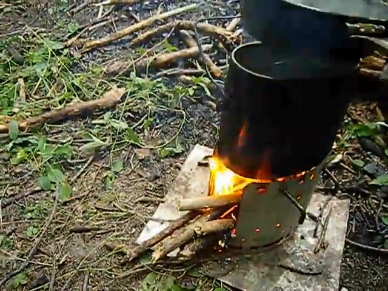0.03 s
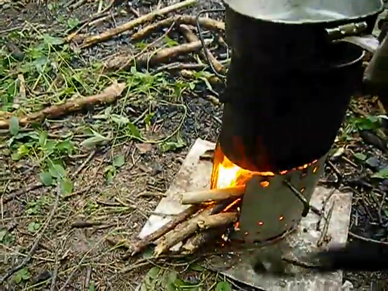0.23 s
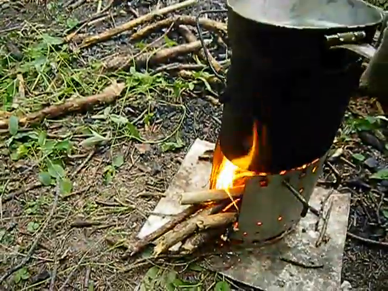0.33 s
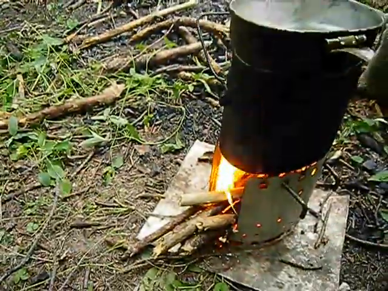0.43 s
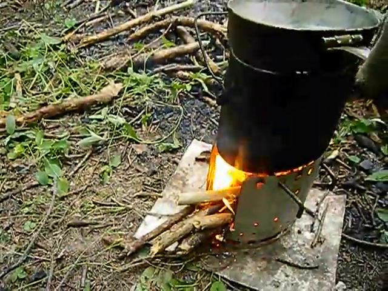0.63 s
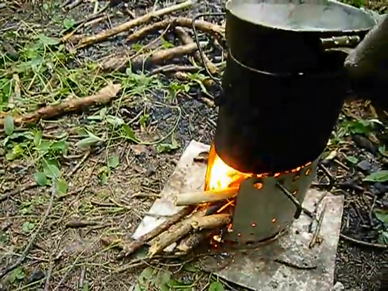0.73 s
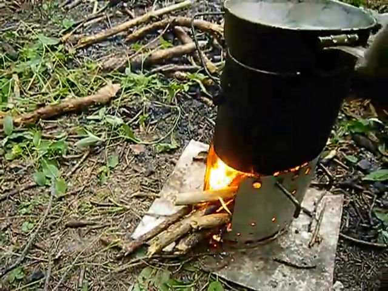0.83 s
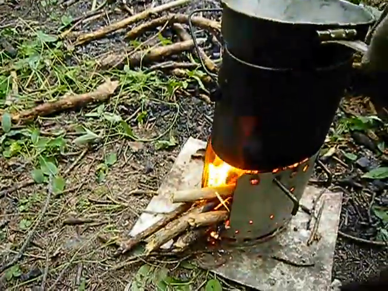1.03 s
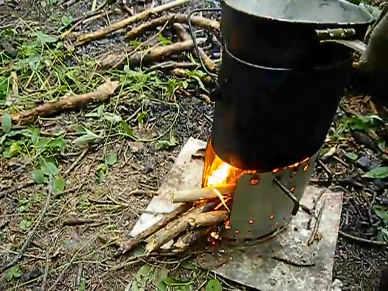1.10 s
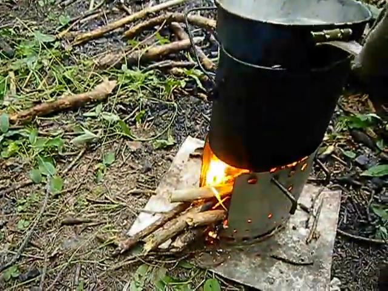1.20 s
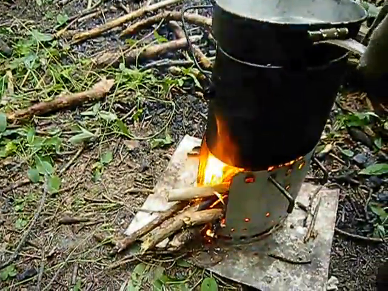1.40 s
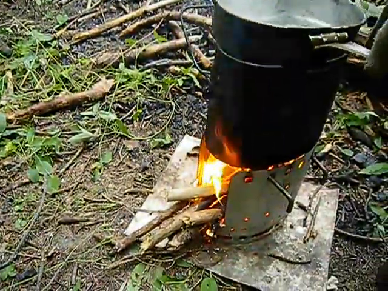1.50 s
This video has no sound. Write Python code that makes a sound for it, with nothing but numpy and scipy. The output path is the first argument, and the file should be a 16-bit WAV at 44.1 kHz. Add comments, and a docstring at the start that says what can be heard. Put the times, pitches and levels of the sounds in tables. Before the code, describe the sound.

A metal pot clanks hard into another pot, then knocks and settles over a faint fire

```python
"""Outdoors, at a small wood-burning camp stove: a metal pot is set into a second pot, heard in mono.
It clanks and rings until seated at 0.34 s, is nudged about, then knocks again and scrapes to rest.
Knocks and cracks are damped sines with noise; wall and singing modes are decaying sines, with echoes.
Behind the pot throughout, shaped noise makes the fire's faint rush, hiss and crackle, with pops and snaps.
At the microphone end, a dull-sounding recorder with a fast limiter flattens the clanks."""
import sys
import numpy as np
from scipy import signal
from scipy.fft import rfft, irfft
from scipy.io import wavfile
from scipy.ndimage import uniform_filter1d

SR = 44100
rng = np.random.default_rng(int(sys.argv[2]) if len(sys.argv) > 2 else 0)


def wav_record(signal):
    """Record a signal, one row per channel, as 16-bit PCM in the file named by sys.argv[1]."""
    frames = np.transpose(np.atleast_2d(signal))
    bounded = np.clip(frames, -1, 1)
    # unit amplitude maps onto the largest positive 16-bit level
    quanta = np.round(bounded * 32767).astype(np.int16)
    wavfile.write(sys.argv[1], SR, quanta)


N = 68355  # samples, 1.55 s

# All source levels are set ahead of the pot's low cut and the recorder.
# Clanks of pot in pot. Each row: start in seconds, knock level in dB, knock pitch in Hz,
# knock rise in seconds, crack level in dB, crack pitch in Hz, wall level in dB,
# then the levels of the six singing modes in dB.
CLANKS = [(0.2377, 7, 1027, 0.0014, 11, 2334, -11, 2, -14, -4.5, -6, -9, -26.5),
          (.2572, -13, 930, 0.0015, -7.5, 1400, -20.5, -35, -35, -30, -40, -40, -59),
          (.2853, 6.5, 915, 0.00081, 0, 1180, -26, -35, -48, -18, -50, -57.5, -53),
          (.3442, -13.5, 844, 0.0016, -43, 1690, -25, -47.5, -72, -25, -49, -61, -72),
          (1.0405, -16.5, 868, 0.0015, -32.5, 1398, -34, -53.5, -61.5, -49.5, -70.5, -72.5, -100.5),
          (1.1537, -7.5, 851, 0.00091, -24, 1590, -23, -45.5, -27.5, -40.5, -44.5, -54, -71.5),
          (1.1950, -8, 794, 0.0014, -20, 2400, -25.5, -40, -46, -46.5, -32, -40.5, -59),
          (1.2431, -1, 853, 0.00096, -6.5, 2150, -20.5, -27.5, -30, -31, -29.5, -27, -43.5)]
# Light touches of pot on pot and stove. Each row: start in seconds, level in dB, pitch in Hz.
NUDGES = [(.3122, -11, 902), (.412, -37, 850), (.503, -36.5, 800), (.5488, -28, 792), (.9068, -35.5, 820),
          (.921, -42, 820), (.9355, -34.5, 814), (1.006, -40, 862), (1.0465, -27, 887),
          (1.2002, -11.5, 725), (1.2112, -14, 930), (1.268, -19.5, 800), (1.3765, -32, 774),
          (1.392, -37.5, 790), (1.419, -38, 760), (1.442, -34.5, 756), (1.4555, -39, 800),
          (1.4665, -37, 756), (1.485, -40, 790)]
# Modes of the pot's wall and bottom. Each row: pitch in Hz, level in dB relative to the clank's
# wall level, time to fall by 60 dB in seconds.
WALL_MODES = [(645, -9, 0.084), (742, -10.5, 0.21), (873, -11.5, 0.14), (929, -6.5, .12),
              (1075, -17.5, 0.072), (1190, -24.5, 0.064), (1782, -14.5, .11), (2517, -17, 0.058),
              (3060, -21, 0.1)]
# Pitches of the six singing modes, in Hz.
SINGING_HZ = [850, 1440.5, 2144, 2864, 3180, 4820]
# Decay of each singing mode. Each row: time to fall by 60 dB hanging free in seconds, then seated.
SINGING_T60 = [(0.13, 0.24), (0.59, 0.24), (0.41, 0.14), (0.12, 0.16), (0.25, .24), (0.29, .26)]
# Spectrum of the grit in a crack. Each row: frequency in Hz, relative density in dB per Hz.
CRACK_SPECTRUM = [(300, -27), (600, -12.5), (1200, -1), (1800, 3), (2400, -2.5), (3100, -4.5), (3600, -23),
                  (4300, -17.5), (5200, -26)]
# Brief sizzle of the wall's many close upper modes, merged.
# Each row: frequency in Hz, relative density in dB per Hz.
SIZZLE_SPECTRUM = [(1500, -16), (2400, -6), (3400, -1.5), (3900, 10.5), (4200, -2.5), (4600, -20.5)]
# Spectrum of the last scrape. Each row: frequency in Hz, relative density in dB per Hz.
SCRAPE_SPECTRUM = [(300, -17), (600, 0.5), (750, 0.5), (1000, -2.5), (1300, -19), (1800, -17),
                   (2600, -15.5), (4200, -29.5)]
# Rush of the fire. Each row: frequency in Hz, relative density in dB per Hz.
FIRE_SPECTRUM = [(25, -3), (50, -12.5), (90, -10), (130, -0.5), (220, 2.5), (300, 2), (420, -1), (650, -1),
                 (1000, -3.5), (1800, -9), (2600, -11), (3400, -11.5), (4200, -19.5), (5000, -46)]
# Thin hiss from the burning sticks. Each row: frequency in Hz, relative density in dB per Hz.
HISS_SPECTRUM = [(1000, -32.5), (1600, -9.5), (1750, 10.5), (1900, -0.5), (2250, 0), (3000, -6),
                 (4200, -30)]
# Dull pops in the fire. Each row: start in seconds, level in dB, pitch in Hz.
POPS = [(0.664, -38.5, 410), (1.4907, -42, 287)]
# Snaps of the burning sticks. Each row: start in seconds, level in dB.
SNAPS = [(.394, -39), (.597, -50), (.630, -43), (.691, -40), (0.7332, -33), (.824, -43), (.9225, -37.5),
         (1.072, -45.5), (1.1415, -42.5), (1.397, -40.5)]
# Spectrum of snaps and fine crackle. Each row: frequency in Hz, relative density in dB per Hz.
SNAP_SPECTRUM = [(300, -12.5), (1200, -27.5), (2000, 4.5), (3500, 1.5), (4300, -4), (5200, -23.5)]

# Pot: grit is relative to the crack, sizzle to the wall, thud to the crack
SEATED_S, RING_RISE_S, NUDGE_RISE_S = 0.34, 0.0011, 0.0016
CRACK_CYCLES, GRIT_DB, CRACK_DECAY_S = 0.91, -5, 0.0029  # cycles of its own pitch in a crack's rise
SIZZLE_DB, SIZZLE_DECAY_S = -19, 0.0078
THUD_DB, THUD_HZ, THUD_RISE_S = -18.5, 454, 0.00095
SCRAPE_S, SCRAPE_WIDTH_S, SCRAPE_DB = 1.452, 0.039, -39.5
LOW_CUT_HZ = 641
# Surroundings: the cracks feed the echoes at a lower level than the knocks
ECHO_DB, ECHO_T60_S, ECHO_DELAY_S, CRACK_ECHO_DB = -8, 0.1, 0.004, -7
# Fire
FIRE_DB, FLICKER_DB = -47.5, 1.79  # flicker is the rms swing of the level
HISS_S, HISS_WIDTH_S, HISS_DB = 0.79, 0.19, -53.5
POP_RISE_S, SNAP_DECAY_S = 0.0039, 0.0016
CRACKLES_PER_S, CRACKLE_DB, CRACKLE_SPREAD_DB = 130, -60, 3
# Recorder
RECORDER_HZ, EDGE_HZ = 4465, 16800
LIMIT_DB, LIMIT_S, LOOKAHEAD_S, CEILING = -16.5, 0.018, 0.0024, 0.66


def pot():
    """Clanks, nudges and a last scrape; a small pot radiates little bass, the stove thuds faintly."""
    knocks, cracks, rings, thuds = np.zeros((4, N))
    for s, knock_db, hz, rise_s, crack_db, crack_hz, wall_db, *mode_db in CLANKS:
        add(knocks, s, knock(knock_db, hz, rise_s))
        add(cracks, s, crack(crack_db, crack_hz))
        add(rings, s, ring(s, wall_db, mode_db))
        add(rings, s, burst(SIZZLE_SPECTRUM, wall_db + SIZZLE_DB, SIZZLE_DECAY_S))
        add(thuds, s, knock(crack_db + THUD_DB, THUD_HZ, THUD_RISE_S))
    for s, db, hz in NUDGES:
        add(knocks, s, knock(db, hz, NUDGE_RISE_S))
    scrape = swell(SCRAPE_SPECTRUM, SCRAPE_DB, SCRAPE_S, SCRAPE_WIDTH_S)
    echoes = scatter(knocks + amp(CRACK_ECHO_DB) * cracks)
    low_cut = signal.butter(N=11, Wn=LOW_CUT_HZ, btype="high", fs=SR, output="sos")
    # the stove's thud keeps its bass
    return thuds + signal.sosfilt(low_cut, knocks + cracks + echoes + rings + scrape)


def knock(db, hz, rise_s):
    """A heavily damped resonance: a hollow thump when low and slow, a crack when high and quick."""
    t = np.arange(SR // 20) / SR
    envelope = t / rise_s * np.exp(1 - t / rise_s)  # peaks at 1 after rise_s
    return amp(db) * envelope * np.sin(2 * np.pi * hz * t)


def crack(db, hz):
    """Hard contact: a quick damped resonance with a gritty puff of noise."""
    return knock(db, hz, CRACK_CYCLES / hz) + burst(CRACK_SPECTRUM, db + GRIT_DB, CRACK_DECAY_S)


def ring(s, wall_db, mode_db):
    """The wall rings briefly; the singing modes change their decay once the pot is seated."""
    t = np.arange(SR // 2) / SR
    free = np.minimum(t, max(SEATED_S - s, 0))  # time spent unseated so far
    sound = np.zeros(len(t))
    for hz, db, t60 in WALL_MODES:
        sound += amp(wall_db + db) * fall(t / t60) * np.sin(2 * np.pi * hz * t)
    for db, hz, (free_t60, seated_t60) in zip(mode_db, SINGING_HZ, SINGING_T60):
        decay = fall(free / free_t60 + (t - free) / seated_t60)
        sound += amp(db) * decay * np.sin(2 * np.pi * hz * t)
    return sound * (1 - np.exp(-t / RING_RISE_S))


def scatter(x):
    """Short scattered echoes from the stove, the ground and the undergrowth."""
    t = np.arange(SR // 2) / SR
    signs = rng.choice([-1., 1.], len(t))
    present = (rng.random(len(t)) < 0.1) * (t > ECHO_DELAY_S)  # sparse reflections
    taps = signs * present * fall(t / ECHO_T60_S)
    return amp(ECHO_DB) * signal.fftconvolve(x, taps / np.linalg.norm(taps))[:N]


def fire():
    """A flickering rush with fine crackle, a passing hiss and a few pops and snaps."""
    flicker = unit(uniform_filter1d(rng.standard_normal(N), size=900))
    out = amp(FIRE_DB + FLICKER_DB * flicker) * noise(FIRE_SPECTRUM, N)
    out += swell(HISS_SPECTRUM, HISS_DB, HISS_S, HISS_WIDTH_S)
    for s, db, hz in POPS:
        add(out, s, knock(db, hz, POP_RISE_S))
    for s, db in SNAPS:
        add(out, s, burst(SNAP_SPECTRUM, db, SNAP_DECAY_S))
    return out + crackle()


def crackle():
    """Sparks at random moments, each a sudden puff of noise that dies away exponentially."""
    struck = rng.random(N) < CRACKLES_PER_S / SR
    excess = np.minimum(rng.exponential(1, N), 4)  # a few sparks are much louder
    sparks = struck * amp(CRACKLE_DB + CRACKLE_SPREAD_DB * excess)
    envelope = signal.lfilter([1], [1, -np.exp(-1 / (SR * SNAP_DECAY_S))], sparks)
    return noise(SNAP_SPECTRUM, N) * envelope


def burst(points, db, decay_s):
    """A sharp puff of noise that dies away exponentially."""
    t = np.arange(SR // 20) / SR
    shape = np.exp(-t / decay_s)
    return amp(db) * unit(noise(points, len(t)) * shape) * np.sqrt(np.mean(shape ** 2))


def swell(points, db, s, width_s):
    """Noise that rises and fades around time s."""
    t = np.arange(N) / SR
    return amp(db) * noise(points, N) * np.exp(-((t - s) / width_s) ** 2)


def noise(points, size):
    """Noise of rms 1 with the given spectrum, interpolated over log frequency."""
    f, db = np.transpose(points)
    hz = np.fft.rfftfreq(size, 1 / SR)
    gain = amp(np.interp(np.log(hz + 1), np.log(f), db))
    return unit(irfft(rfft(rng.standard_normal(size)) * gain, size))


def fall(periods):
    """Exponential decay, losing 60 dB in each decay time."""
    return np.exp(-np.log(1000) * periods)


def amp(db):
    """Decibels to gain."""
    return 10 ** (np.asarray(db) / 20)


def unit(x):
    """Scales to rms 1."""
    return x / np.sqrt(np.mean(x ** 2) + 1e-20)


def add(mix, s, sound):
    """Mixes a sound in at time s."""
    part = mix[max(round(s * SR), 0):][:len(sound)]
    part += sound[:len(part)]


def scene():
    """Pot and fire, in mono."""
    return (pot() + fire())[None]


def record(dry):
    """A narrow-band input, a fast limiter, clipping of what still exceeds the ceiling, a band limit."""
    x = signal.sosfilt(signal.butter(N=18, Wn=RECORDER_HZ, fs=SR, output="sos"), dry)
    keep = np.exp(-1 / (SR * LIMIT_S))
    power = signal.lfilter([1 - keep], [1, -keep], x[0] ** 2)
    t = np.arange(N) / SR
    level = np.sqrt(np.interp(t + LOOKAHEAD_S, t, power))  # read slightly ahead
    gain = 1 / np.maximum(level / amp(LIMIT_DB), 1)
    x = x * uniform_filter1d(uniform_filter1d(gain, size=30), size=22)
    x = np.clip(x, -CEILING, CEILING)
    band_limit = signal.firwin(511, EDGE_HZ, window=("kaiser", 9), fs=SR)
    return signal.oaconvolve(x, band_limit[None], "same")


dry = scene()
out = record(dry)
wav_record(out)
```